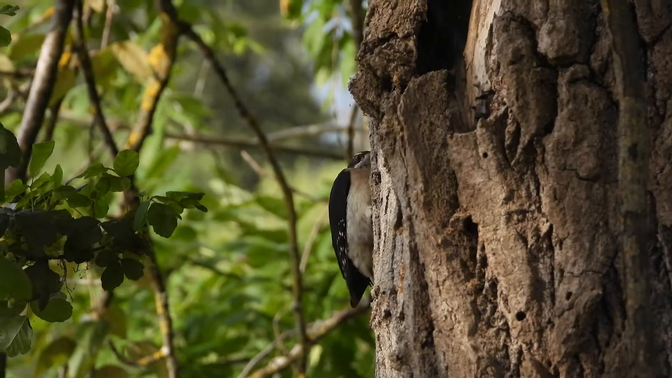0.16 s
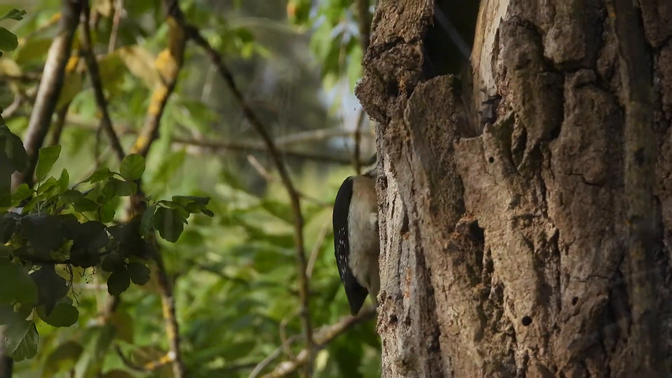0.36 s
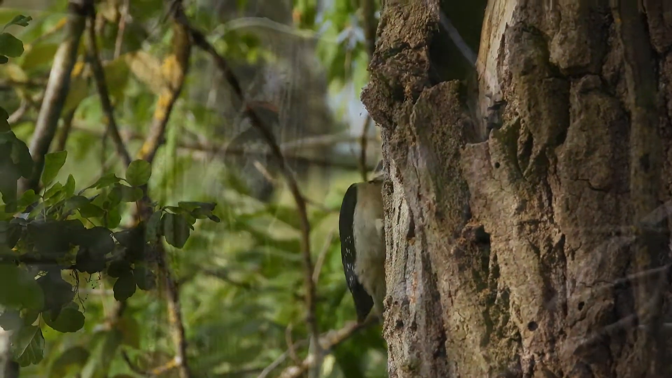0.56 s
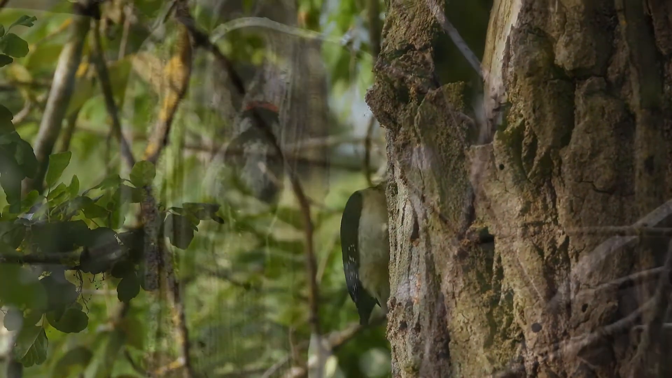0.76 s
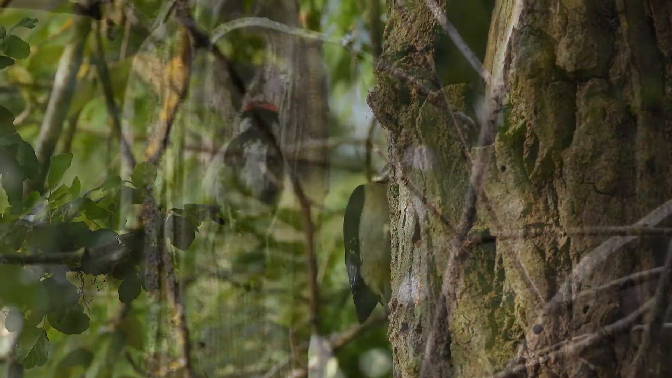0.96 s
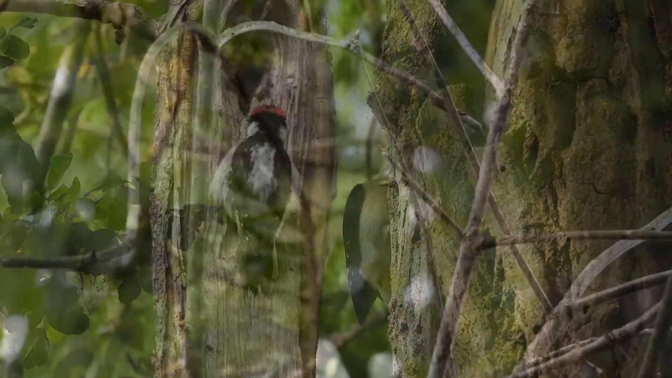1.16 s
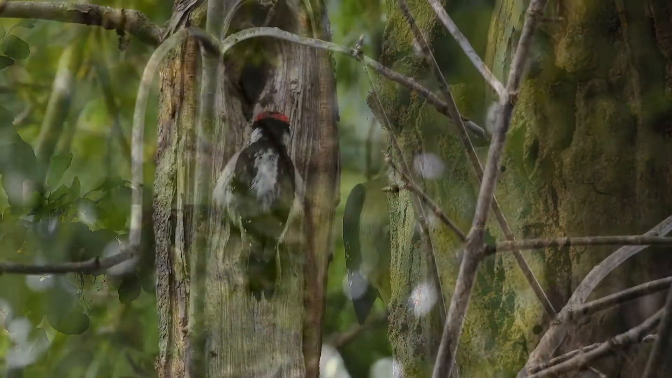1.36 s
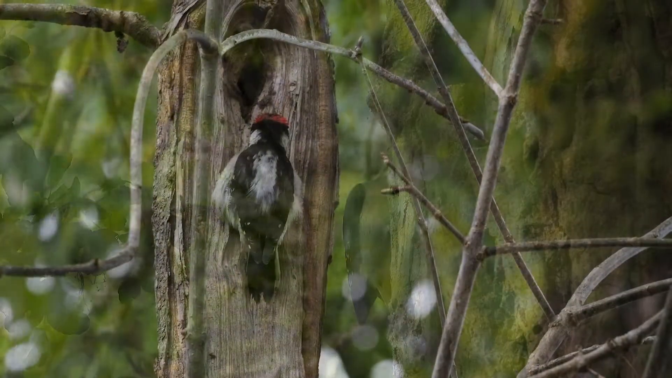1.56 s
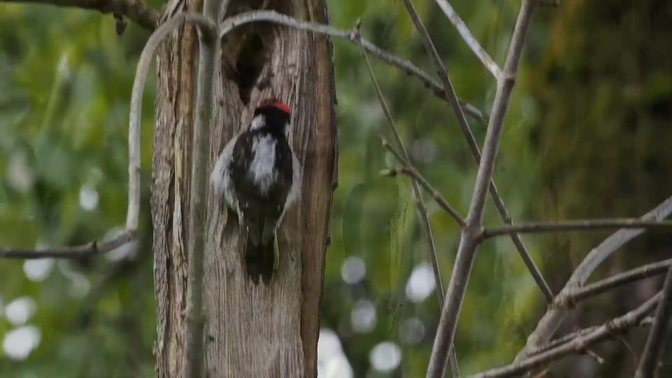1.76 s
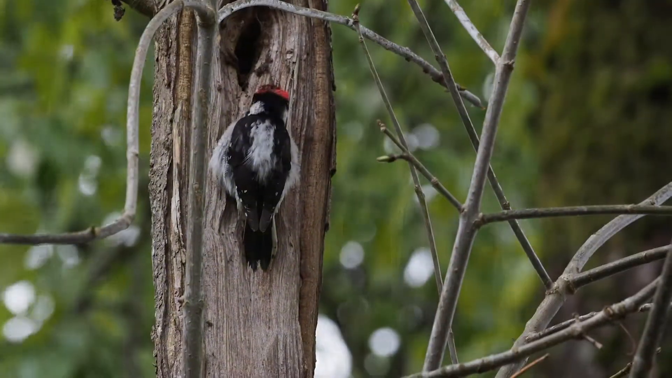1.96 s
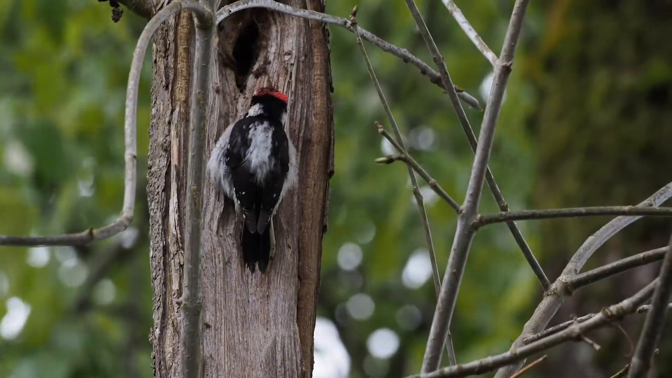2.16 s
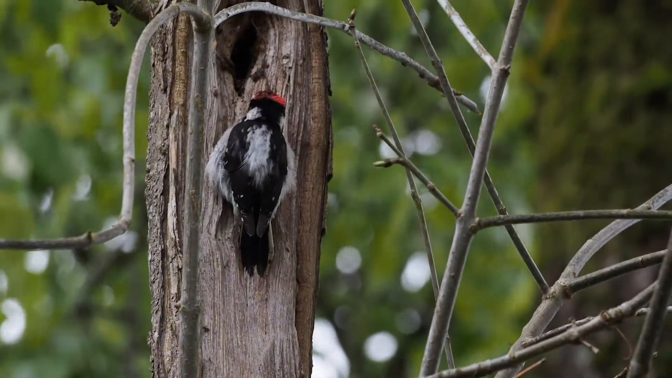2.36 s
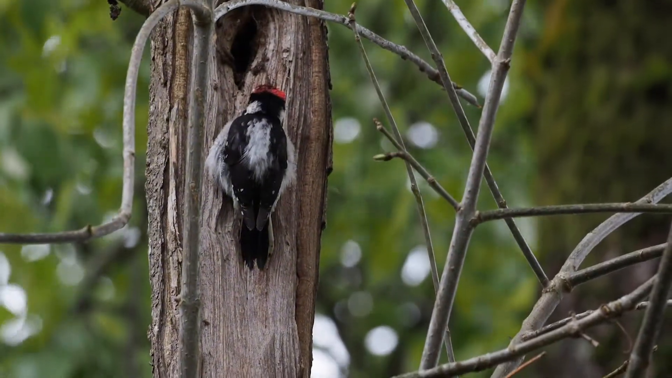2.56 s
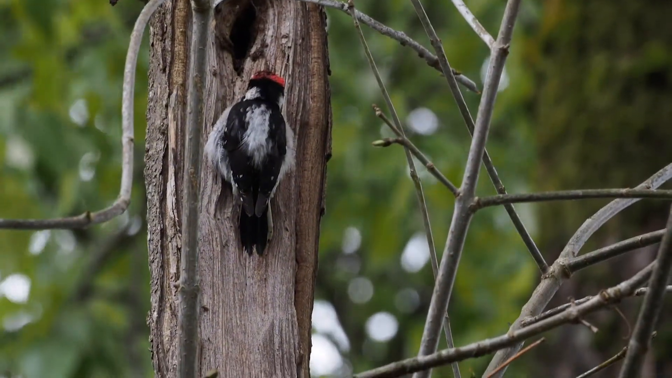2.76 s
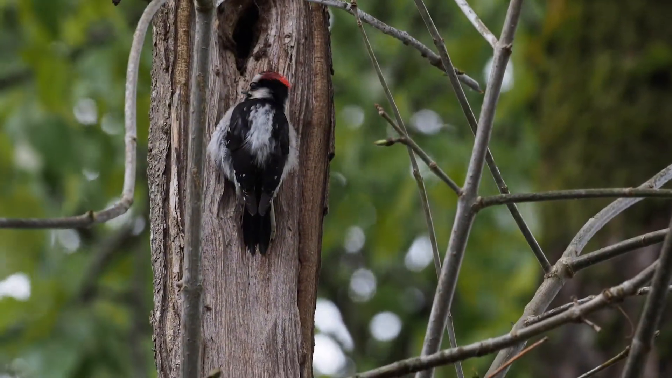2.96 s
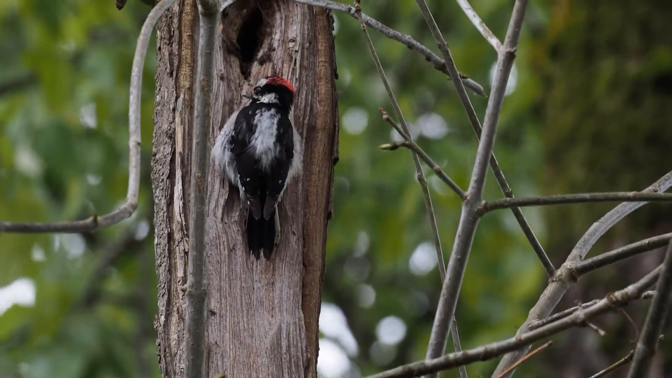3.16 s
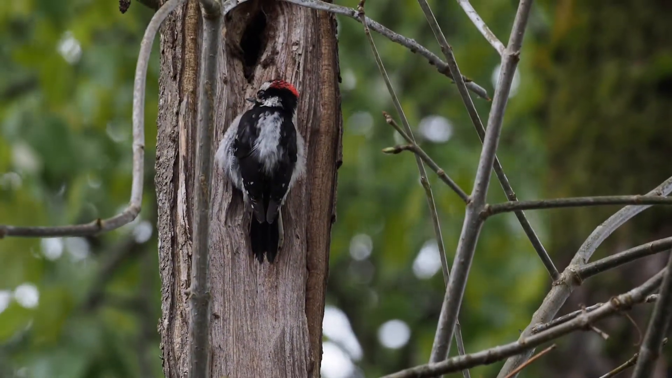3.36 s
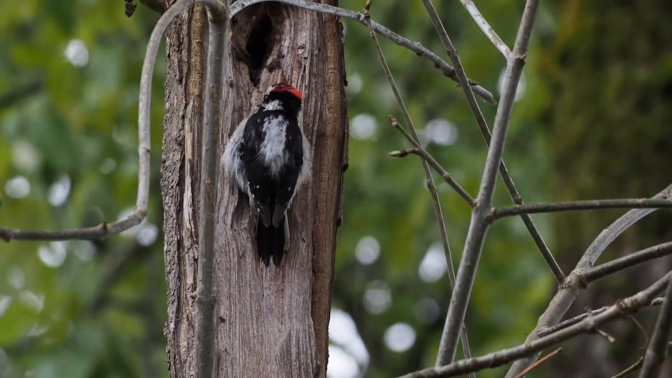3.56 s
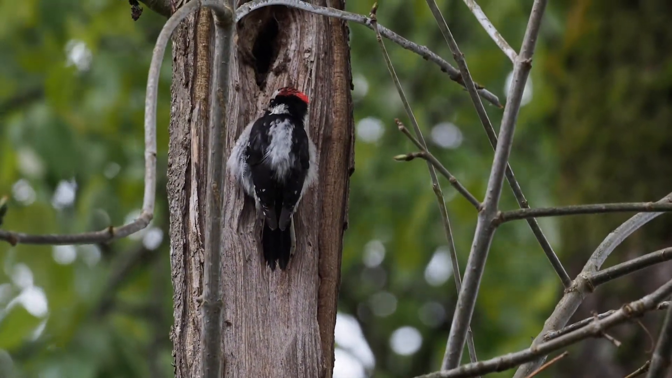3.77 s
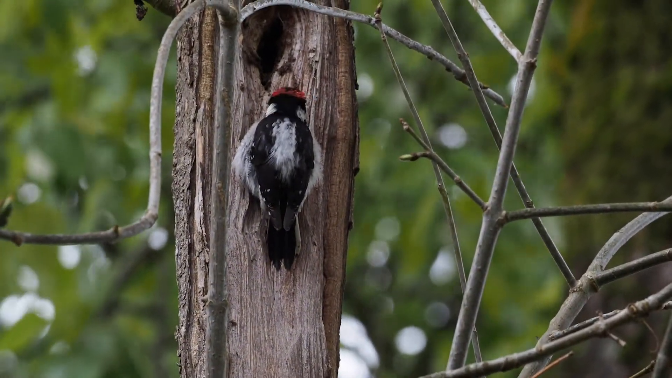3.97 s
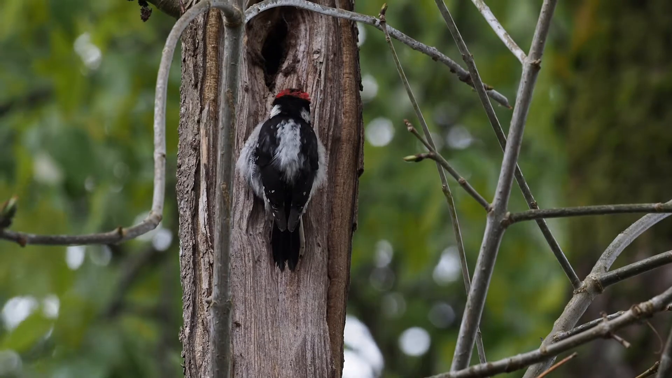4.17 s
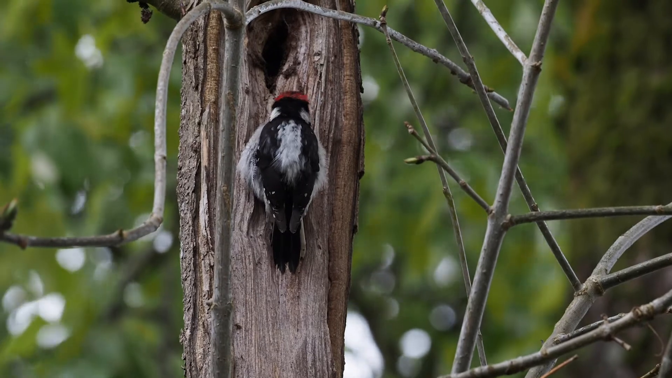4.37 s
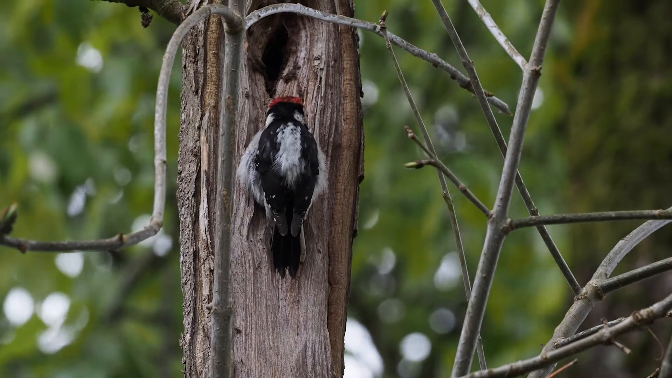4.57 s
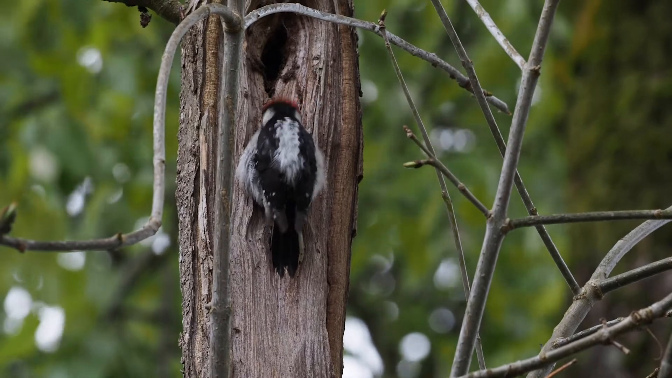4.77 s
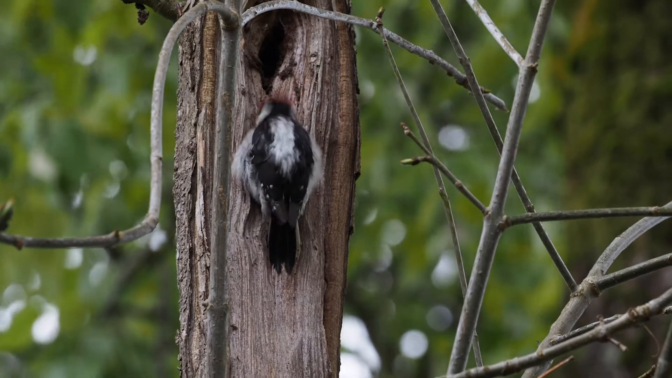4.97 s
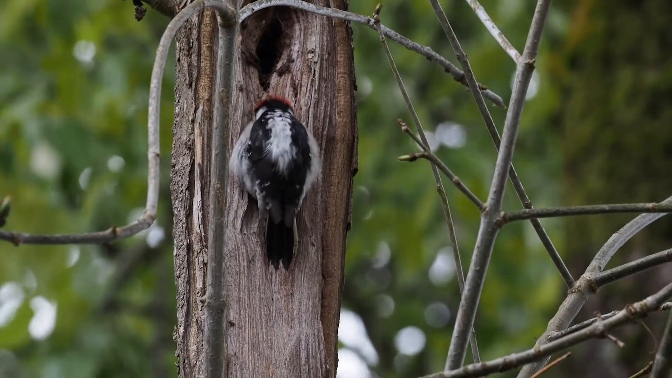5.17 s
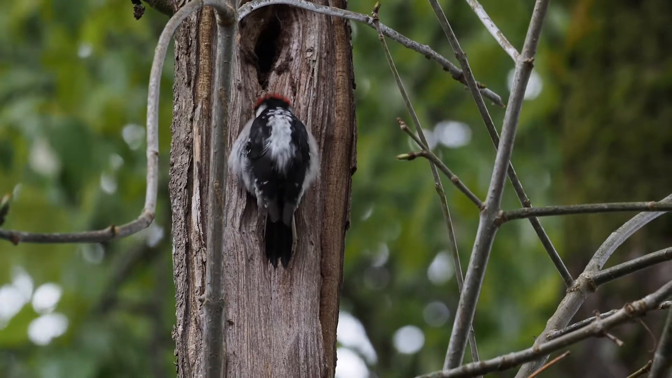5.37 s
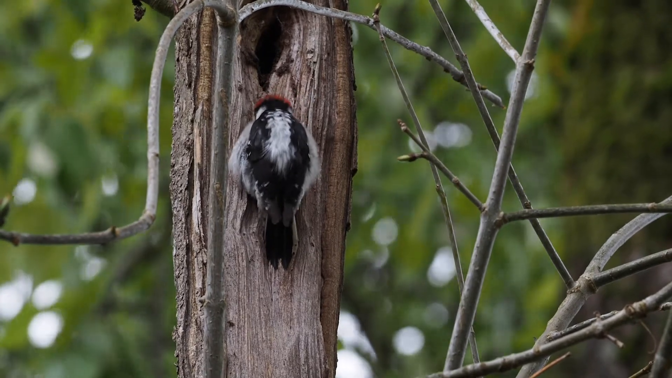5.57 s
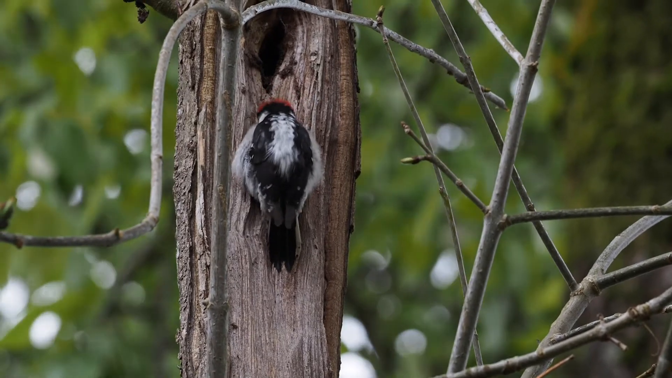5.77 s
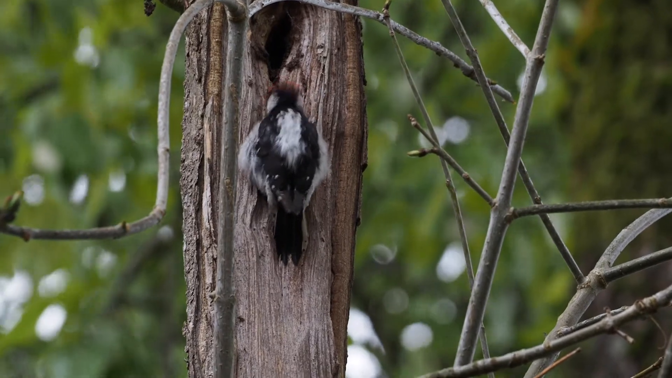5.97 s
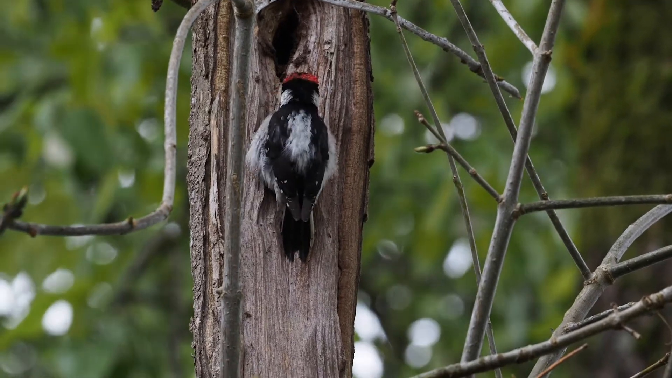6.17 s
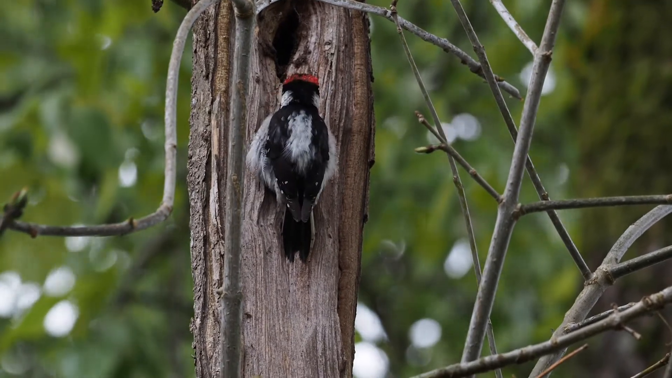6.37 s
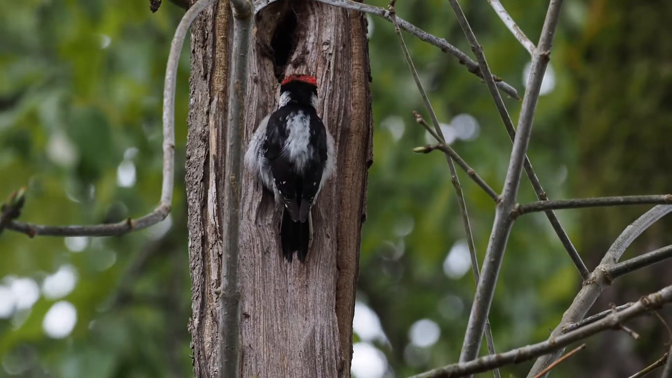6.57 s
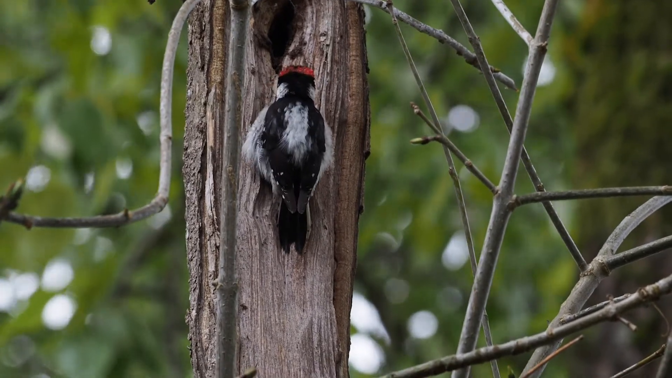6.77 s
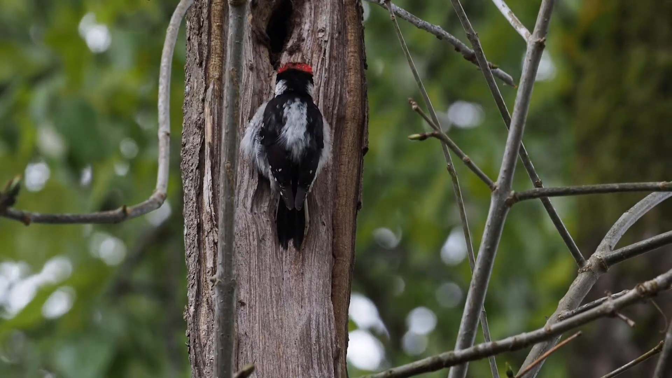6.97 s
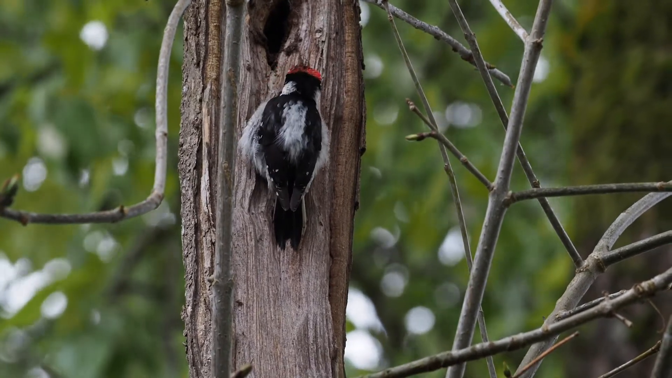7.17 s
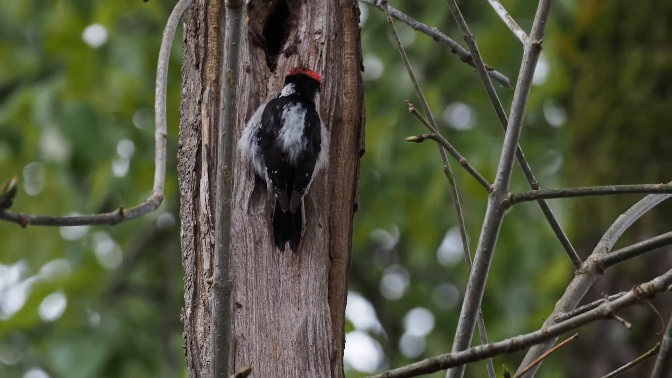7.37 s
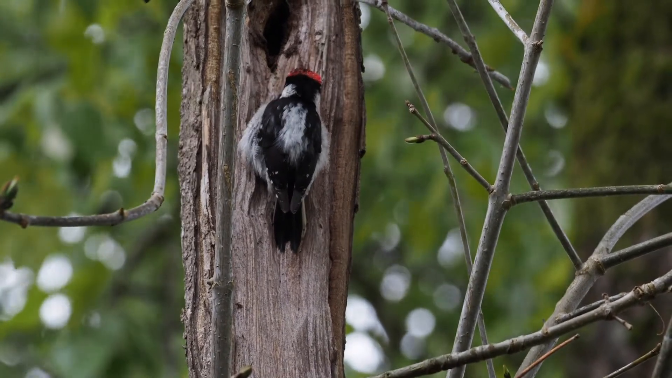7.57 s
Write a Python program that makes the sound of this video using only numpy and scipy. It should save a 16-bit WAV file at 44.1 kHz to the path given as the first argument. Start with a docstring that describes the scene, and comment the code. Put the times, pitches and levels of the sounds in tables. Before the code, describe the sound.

In a very quiet wood, a woodpecker gives two faint taps on bark, and the sound fades away. A louder woodland opens, with a steady distant rush, light leaf hiss and small birds warbling, whistling and trilling. Past the middle, the woodpecker drums one loud, rapid roll on a hollow trunk, fairly near the microphone. It slows slightly and echoes through the trees while the birds carry on.

```python
"""A woodpecker in two woods

In a very quiet wood, a woodpecker taps twice on bark, and everything fades to silence.
Then a louder wood opens, with a distant rush, a low hum and small birds that whistle and trill.
A woodpecker drums one slowing roll: each blow of its bill makes a hollow dead trunk ring,
and the ground and the trees around throw every blow back."""
import sys
import numpy as np
from scipy import signal
from scipy.fft import rfft, irfft, next_fast_len
from scipy.io import wavfile
from scipy.ndimage import map_coordinates

SR = 44100
rng = np.random.default_rng(int(sys.argv[2]) if len(sys.argv) > 2 else 0)


def generate_wav(sig):
    """Save sig (samples, or channels by samples) to the path in sys.argv[1] as 16-bit PCM at SR."""
    pcm = np.round(np.clip(np.atleast_2d(sig).T, -1, 1) * 32767).astype(np.int16)
    wavfile.write(sys.argv[1], SR, pcm)


N = 336483
SECOND_WOOD_S = 1.231  # when the louder wood starts


def drumming(start_s, count, level_db, vary_db):
    """Each blow of the bill makes the hollow trunk ring briefly at its own natural pitches."""
    # the trunk's ringing tones: (pitch [Hz], relative level [dB], time to fade 60 dB [s], rise time [s])
    trunk_tones = [(595, -12.5, 0.04, 0.012), (859, -24, 0.064, 0.0016), (1044.6, 2, 0.032, 0.00095),
                   (2152, -14.5, 0.0065, .0003), (2390, -15, 0.0066, 0.00032),
                   (2860, -21.5, 0.0073, 0.00014), (3900, -33, .004, .0002), (5370, -31, 0.0037, .0002),
                   (8100, -42, 0.0047, .0003)]
    # the bird slows as it goes: (blow number, gap to the next blow [ms])
    blow_gaps = [(0, 58.3), (1, 56.9), (10, 68), (13, 65), (18, 76.8), (19, 84)]
    # it gains force, tires slowly and ends softly: (blow number, relative strength [dB])
    blow_force = [(0, -5), (1, -.5), (3, 1.34), (19, -0.34), (20, -2.5)]
    # how well the narrow trunk passes sound to the air: (frequency [Hz], gain [dB])
    radiation = [(40, -18), (200, -11.5), (400, -8.5), (520, -4), (1100, -1), (1500, -5), (1750, -9),
                 (1950, 0), (3200, -1.5), (5500, -2), (6500, -9), (12000, 1.5)]
    t = np.arange(SR // 12) / SR
    hz, db, t60, rise = np.transpose(trunk_tones)[:, :, None]
    envelopes = amp(db - 60 * t / t60) * (1 - np.exp(-t / rise))
    tones = -envelopes * np.sin(2 * np.pi * hz * t)
    number = np.arange(count)
    gaps_s = np.interp(number, *np.transpose(blow_gaps)) / 1000
    times = start_s + np.cumsum(gaps_s) - gaps_s
    strengths = np.interp(number, *np.transpose(blow_force))
    # the bill lands a little differently each time, which matters most to the high tones
    changes = vary_db * rng.standard_normal((count, len(trunk_tones))) * np.minimum(hz.T / 3000, 1) ** 2
    blows = np.zeros(N)
    for s, strength_db, change_db in zip(times, strengths, changes):
        add(blows, s, amp(level_db + strength_db + change_db) @ tones)
    return filtered(blows, lambda hz: amp(along(radiation, hz)))


def among_trees(blows, pan_db, forest_db):
    """The blows arrive directly, then bounce back from the ground, trunks, twigs and far trees."""
    # echoes from the ground and near trunks: (delay [ms], left gain [dB], right gain [dB])
    near_echoes = [(5.24, -12, -12), (7.31, -11, -18), (9.12, -17, -23), (13.01, -35, -20),
                   (16.16, -21, -25), (23.9, -17, -17), (37.98, -19, -23)]
    direct = panned(blows, pan_db)
    near = direct.copy()
    for ms, left_db, right_db in near_echoes:
        add(near, ms / 1000, direct * amp([[left_db], [right_db]]))
    return near + twig_echoes(blows, t60=0.62) + amp(forest_db) * forest_echo(near.mean(axis=0))


def bark_taps(thud_t60, splinter_t60, thud_db, knock_db):
    """A light peck makes a knock, a dull thud and a spray of bark; a harder one rings brighter."""
    # the pecks: (time [s], relative level [dB], splinter gain [dB], high-tone gain [dB], splinter pan [dB])
    pecks = [(.668, -52, -10.5, -17, 0), (.895, -55.5, -4.5, 3.5, -5)]
    # the solid trunk's ringing tones: (pitch [Hz], relative level [dB], time to fade 60 dB [s])
    wood_tones = [(314, -7, 0.11), (450, -1.5, 0.11), (1413, -8, 0.062), (2380, -7, 0.063)]
    # the dull thud of bark: (frequency [Hz], relative level [dB])
    thud_spectrum = [(88, -49), (150, -18), (288, 3), (469, -5), (626, -5), (710, -37), (912, -36),
                     (1200, -44), (1310, -16), (1400, -13), (1620, -36), (1930, -42), (2390, -25),
                     (3000, -33), (3900, -61), (6600, -120)]
    # bark splintering: (frequency [Hz], relative level [dB])
    splinter_spectrum = [(1500, -22), (2400, -4), (3500, -15), (5700, 5), (7000, -7), (8500, -16),
                         (12000, -17), (14000, -50)]
    out, t = np.zeros((2, N)), np.arange(SR // 5) / SR
    attack = 1 - np.exp(-t / .0015)
    for s, db, splinter_db, hard_db, pan_db in pecks:
        knock = np.zeros(len(t))
        for hz, tone_db, t60 in wood_tones:
            envelope = amp(knock_db + tone_db + hard_db * (hz > 1000) - 60 * t / t60)
            knock += envelope * np.sin(2 * np.pi * hz * t)
        thud = noise(thud_spectrum, size=len(t)) * amp(thud_db - 60 * t / thud_t60)
        spray = panned(noise(splinter_spectrum, size=len(t)), pan_db)
        spray *= amp(splinter_db - 60 * t / splinter_t60)
        add(out, s, amp(db) * (knock + thud + spray) * attack)
    return out


def songbirds():
    """All the small birds, blurred by the trees between; the farther ones carry more echo."""
    notes = warbler(gain_db=-1.7, pan_db=6.5) + high_whistles(gain_db=-1) + peeps(gain_db=-0.5)
    notes += pips(start_s=0.3904, period_s=.1135, first_db=-54.5, loss_db=3, count=5)
    far = rasps(gain_db=-1, pan_db=-5) + trills(gain_db=-3)
    far += far_chorus(low_hz=2557, high_hz=7570, slide=.2, high_db=-18, count=150)
    second_wood = np.arange(N) / SR >= SECOND_WOOD_S
    direct = np.where(second_wood, lagged(notes, ms=0.12) + amp(-2) * far, notes + far)
    # the first wood has less echo
    scatter = amp(np.where(second_wood, -6.5, -7)) * twig_echoes(notes + far, t60=.15)
    tail = amp(np.where(second_wood, -8, -17)) * forest_echo(notes + amp(1.5) * far)
    return direct + scatter + tail


def warbler(gain_db, pan_db):
    """A bird sings quick sliding notes; most fall in pitch and flatten toward the end."""
    # its notes: (time [s], middle pitch [Hz], glide [octaves], relative level [dB])
    slides = [(1.226, 3950, -.35, -48.5), (1.41, 3700, -.45, -49), (1.678, 3470, -0.39, -43),
              (1.715, 3750, .3, -49), (1.828, 4050, -.25, -46), (1.968, 3440, -0.56, -37),
              (2.075, 4260, .12, -47.5), (2.125, 3000, .25, -43), (2.16, 3020, -.22, -36),
              (2.208, 3080, -.4, -35), (2.398, 3295, -0.47, -38.5), (2.528, 3100, -.5, -41),
              (2.604, 2866, 0.19, -41), (2.684, 3380, -.38, -42.5), (2.713, 3650, .42, -46.5),
              (2.75, 3230, -.4, -38.5), (2.882, 3000, -.1, -40.5), (2.944, 2480, -.3, -48),
              (3.165, 4140, -.48, -42.5), (3.33, 4200, -.2, -46), (3.365, 3820, -.1, -47.5),
              (3.406, 3184, -.48, -40), (3.526, 2900, -0.21, -45), (3.567, 3026, .35, -42.5),
              (3.667, 3280, -.35, -47), (3.781, 3090, -.5, -45), (3.888, 3220, -0.51, -39.5),
              (4.005, 2900, -0.47, -47), (4.103, 2900, -0.47, -49)]
    out = np.zeros((2, N))
    for s, hz, octaves, db in slides:
        path = glide(hz, octaves, length_s=.043, bend=.08 * abs(octaves))
        add(out, s, clear_note(path, db + gain_db, pan_db))
    return out


def high_whistles(gain_db):
    """A second bird whistles thin high notes whose pitch sags at both ends."""
    # its notes: (time [s], length [s], middle pitch [Hz], glide [octaves], relative level [dB])
    notes = [(4.355, .03, 5480, -.03, -59), (4.501, .088, 5450, .12, -63), (4.593, .07, 6750, .05, -62.5),
             (4.813, 0.15, 5690, .06, -51), (5.047, .075, 5900, -.02, -52), (5.11, .105, 5890, .04, -53.5),
             (5.256, .145, 6350, .13, -53.5), (5.441, .098, 6700, 0.044, -50.5),
             (5.606, .12, 6880, .02, -53.5), (5.759, .092, 6820, .06, -54.5), (6.1, .12, 4380, -.18, -58),
             (6.535, .044, 5510, 0.0099, -57), (7.52, .09, 6150, .02, -65), (7.58, .045, 7570, -.04, -62)]
    # where it is heard, on the right: (time [s], pan [dB])
    position = [(5.1, -11), (5.5, -4.5)]
    out = np.zeros((2, N))
    for s, length_s, hz, octaves, db in notes:
        pan_db = np.interp(s, *np.transpose(position))
        path = glide(hz, octaves, length_s, bend=-.025)
        add(out, s, clear_note(path, db + gain_db, pan_db, waver=.009))
    return out


def peeps(gain_db):
    """Short clear calls, all on the right."""
    # a third bird's low peeps: (time [s], pitch [Hz], glide [octaves], relative level [dB])
    low_peeps = [(6.295, 2430, -0.151, -48), (6.495, 3060, -.17, -49), (6.574, 2445, .02, -47),
                 (6.735, 2520, -.19, -47), (6.933, 2430, -0.149, -49), (7.065, 2390, -.16, -48.5),
                 (7.204, 2375, .08, -51), (7.382, 3010, .02, -53), (7.488, 2300, -0.0089, -52),
                 (7.574, 2350, .06, -47)]
    # lone calls in the first wood: (time [s], pitch [Hz], glide [octaves], relative level [dB])
    lone_calls = [(.439, 740, -.11, -66.5), (.728, 4130, -.18, -59)]
    out = np.zeros((2, N))
    for calls, pan_db in (low_peeps, -7), (lone_calls, -4):
        for s, hz, octaves, db in calls:
            add(out, s, clear_note(glide(hz, octaves, length_s=0.0352), db + gain_db, pan_db))
    return out


def pips(start_s, period_s, first_db, loss_db, count):
    """A bird in the first wood pips evenly, each pip softer than the last."""
    out = np.zeros((2, N))
    path = glide(hz=3400, octaves=-0.082, length_s=0.028)
    for k in range(count):
        add(out, start_s + k * period_s, clear_note(path, first_db - k * loss_db, pan_db=-9))
    return out


def rasps(gain_db, pan_db):
    """Short harsh notes in the warbling song, made by a wide, fast swing of pitch."""
    # the rasps: (time [s], pitch [Hz], relative level [dB])
    calls = [(2.663, 5680, -54.5), (3.388, 6250, -57), (3.751, 5500, -54), (3.83, 5200, -55)]
    out = np.zeros((2, N))
    for s, hz, db in calls:
        path = glide(hz, octaves=-.14, length_s=.04)
        add(out, s, buzz(path, swing_hz=.115 * hz, swings_per_s=132, db=db + gain_db, pan_db=pan_db))
    return out


def trills(gain_db):
    """Birds swing their pitch quickly up and down in buzzy calls, most longer than the rasps."""
    # the trills: (time [s], length [s], pitch [Hz], glide [octaves], swing [Hz],
    # swing rate [1/s], relative level [dB], pan [dB])
    calls = [(.1, .17, 1886, 0, 231, 107, -61.5, 14), (.172, 0.039, 1928, -0.01, 200, 87, -53, 7),
             (0.322, .046, 1725, -.09, 150, 140, -62, 8), (4.35, .33, 3690, .28, 381, 118, -50.5, 11),
             (4.41, .1, 7300, -.08, 200, 150, -62, 0), (5.39, .47, 4970, .06, 230, 67, -48.5, -8),
             (6.58, .52, 4294, .02, 370, 88, -57.5, -1), (7.24, 0.26, 3080, 0, 130.7, 63, -56, -2)]
    out = np.zeros((2, N))
    for s, length_s, hz, octaves, swing_hz, swings_per_s, db, pan_db in calls:
        add(out, s, buzz(glide(hz, octaves, length_s), swing_hz, swings_per_s, db + gain_db, pan_db))
    return out


def far_chorus(low_hz, high_hz, slide, high_db, count):
    """Far birds add faint sliding chirps at random times; the high ones are rarer and weaker."""
    # how loud the far birds are: (time [s], relative level [dB])
    loudness = [(1.3, -59), (2.2, -54), (3.6, -55), (4.1, -51), (4.25, -68), (7.6, -60)]
    out = np.zeros((2, N))
    for when, height, length, tilt, side in rng.random((count, 5)):
        s = SECOND_WOOD_S + when * (N / SR - SECOND_WOOD_S)
        hz = low_hz * (high_hz / low_hz) ** (height ** 2)
        size = int((0.015 + 0.097 * length) * SR)
        path = hz * (1 + slide * (tilt - .7) * np.linspace(-1, 1, size))
        db = np.interp(s, *np.transpose(loudness)) + high_db * height ** 2
        add(out, s, whistle(path, db, pan_db=12 * (side - .5), edge_s=0.045))
    return out


def glide(hz, octaves, length_s, bend=0):
    """A pitch path that slides through hz; both ends are shifted by bend octaves."""
    position = np.linspace(-.5, .5, int(length_s * SR))
    return hz * 2 ** (octaves * position + bend * (2 * position) ** 2)


def whistle(path, db, pan_db, edge_s):
    """A bird's pure tone along a pitch path; it swells and fades within edge_s seconds."""
    swell = signal.windows.tukey(len(path), min(2 * edge_s * SR / len(path), 1))
    return panned(amp(db) * swell * sine(path), pan_db)


def clear_note(path, db, pan_db, waver=0.0058):
    """A short whistle whose pitch wavers slightly."""
    return whistle(path * (1 + waver * wobble(160, size=len(path))), db, pan_db, edge_s=0.0098)


def buzz(path, swing_hz, swings_per_s, db, pan_db):
    """A whistle whose pitch swings fast and unevenly, loudest at the top of each swing."""
    swing = sine(swings_per_s * (1 + .12 * wobble(40, size=len(path))))
    hz = path + swing_hz * (swing - .45 + 0.39 * wobble(600, size=len(path)))
    pulsing = unit(amp(2 * swing))
    return pulsing * whistle(hz, db, pan_db, edge_s=.065)


def twig_echoes(x, t60):
    """Branches scatter the treble as many tiny echoes that fade 60 dB in t60 seconds."""
    # what the twigs throw back: (frequency [Hz], gain [dB])
    twig_spectrum = [(400, -17), (800, -17), (1100, -24), (1500, 3), (2100, -3), (3200, -1.5), (6000, -7.5),
                     (12000, -18)]
    t = np.arange(SR // 3) / SR
    clicks = rng.standard_normal((3, len(t))) * (rng.random((3, len(t))) < 900 / SR)
    # each side has its own clicks and shares a third set
    echoes = (clicks[:2] + clicks[2]) * amp(-60 * t / t60) * (t > .004)
    echoes /= np.linalg.norm(echoes[0])
    return echoed(x, filtered(echoes, lambda hz: amp(along(twig_spectrum, hz))))


def forest_echo(x):
    """Many trees answer with one long smooth echo; the highest treble dies first."""
    # how long the echo lasts: (frequency [Hz], time to fade 60 dB [s])
    fade_times = [(200, 1.1), (1000, 1.63), (2500, 1.76), (6000, 1.5), (12000, 0.46)]
    white = noise([(20, 0), (20000, 0)], size=SR)
    hz, t, bands = signal.stft(white, SR, nperseg=256)
    fades = amp(-60 * t / along(fade_times, hz)[:, None])
    tail = signal.istft(bands * fades, SR, nperseg=256)[1]
    tail *= 1 - np.exp(-np.arange(tail.shape[1]) / SR / 0.0062)  # soft start
    return echoed(x, tail / np.linalg.norm(tail[0]))


def hush(gain_db):
    """The faint steady noise of the first wood dies away."""
    # its fade: (time [s], relative level [dB])
    loudness = [(0.276, -75), (0.534, -77.5), (0.838, -83), (0.958, -110)]
    # its tone colour: (frequency [Hz], relative level [dB])
    spectrum = [(35, -58), (60, -49), (190, -2), (448, -8.5), (835, -2.5), (1330, -8.5), (2590, -24),
                (4210, -16.5), (7000, -31), (10600, -21), (15000, -45)]
    return amp(curve(loudness) + gain_db) * noise(spectrum)


def distant_rush(start_db, fade_db_per_s):
    """A low, far noise that flutters a little and slowly ebbs."""
    # its tone colour: (frequency [Hz], relative level [dB])
    spectrum = [(15, -90.5), (25, -60.5), (71, -24.5), (117, -20), (151, -15), (216, -8), (252, -5),
                (288, -4), (501, -7), (668, -3), (856, -4), (1020, -2), (1350, -9), (1840, -19),
                (2400, -34), (3120, -44.5), (5280, -120)]
    elapsed = np.arange(N) / SR - SECOND_WOOD_S
    level = amp(start_db - fade_db_per_s * elapsed + .3 * wobble(13))
    return level * lagged(noise(spectrum), ms=0.1)


def leaf_hiss(db):
    """Leaves add a steady high hiss."""
    # its tone colour: (frequency [Hz], relative level [dB])
    spectrum = [(1200, -26), (2400, 6.5), (3400, -1), (4800, -9), (7400, -12), (8400, -16.5),
                (10300, -15.5), (11200, -23), (12000, -17.5), (13300, -15), (14300, -20), (15200, -20),
                (16000, -12.5)]
    return amp(db) * noise(spectrum)


def far_hum(hz, start_db, fade_db_per_s):
    """A far motor-like hum that swells a few times and fades."""
    # swells on top of the hum: (time [s], length [s], level [dB])
    swells = [(1.15, .3, -53.5), (1.798, 0.82, -53.5), (3.3, .3, -54.5), (3.719, 0.62, -55)]
    level = amp(start_db - fade_db_per_s * (np.arange(N) / SR - SECOND_WOOD_S))
    for s, length_s, db in swells:
        add(level, s, amp(db) * signal.windows.tukey(int(length_s * SR)))
    return level * sine(hz + 3 * wobble(14))


def thin_whine(hz, db):
    """A very faint high tone that wavers."""
    return amp(db) * sine(hz + 10 * wobble(37))


def noise(spectrum, size=N):
    """Stereo noise of average (rms) level 1, alike on both sides in the bass but not in the treble."""
    # how alike left and right are: (frequency [Hz], likeness [0 to 1])
    likeness = [(50, .55), (150, 0.97), (300, 0.9), (700, 0.73), (1400, 0.66), (2800, 0), (15000, 0)]

    def colour(hz):
        width = np.arccos(np.clip(along(likeness, hz), -1, 1)) / 2
        return amp(along(spectrum, hz)) * [np.cos(width), np.sin(width)]

    mid, side = filtered(rng.standard_normal((2, size)), colour)
    return unit(np.array([mid + side, mid - side]))


def amp(db):
    """Turn decibels into a gain."""
    return 10 ** (np.asarray(db) / 20)


def unit(x):
    """Scale to an average (rms) level of 1."""
    return x / np.sqrt(np.mean(x ** 2) + 1e-20)


def sine(hz):
    """A pure wave that follows one frequency value per sample."""
    return np.sin(2 * np.pi * np.cumsum(hz) / SR)


def along(points, hz):
    """Read between (frequency [Hz], value) points on a logarithmic frequency scale."""
    frequencies, values = np.transpose(points)
    return np.interp(np.log(hz + 1), np.log(frequencies + 1), values)


def curve(rows):
    """Read between (time [s], value) rows at every sample."""
    return np.interp(np.arange(N) / SR, *np.transpose(rows))


def wobble(rate, size=N):
    """A smooth curve through rate random points a second."""
    return map_coordinates(rng.standard_normal(int(size * rate / SR) + 4), [np.arange(size) * rate / SR])


def filtered(x, response):
    """Multiply each frequency in x by response(hz)."""
    size = x.shape[-1]
    padded = next_fast_len(size + SR // 10)
    return irfft(rfft(x, padded) * response(np.fft.rfftfreq(padded, 1 / SR)), padded)[..., :size]


def add(track, s, sound):
    """Mix a sound into a track, starting at s seconds."""
    part = track[..., max(round(s * SR), 0):][..., :sound.shape[-1]]
    part += sound[..., :part.shape[-1]]


def panned(x, pan_db):
    """Place a sound to one side; pan is the left level minus the right."""
    return x * unit(amp([[pan_db / 2], [-pan_db / 2]]))


def lagged(x, ms):
    """Sound from one side reaches the left ms milliseconds after the right."""
    return filtered(x, lambda hz: np.exp(np.outer([-1j, 1j], np.pi * hz * ms / 1000)))


def echoed(x, echoes):
    """Play x through a stereo pattern of echoes (convolution)."""
    return signal.fftconvolve(np.atleast_2d(x), echoes, axes=1)[:, :N]


def scene():
    """Mix all sources; the first wood fades out before the second begins."""
    t = np.arange(N) / SR
    first_wood = t < SECOND_WOOD_S
    birds = songbirds()
    blows = drumming(start_s=4.7963, count=21, level_db=-4.6, vary_db=1.0)
    roll = among_trees(blows, pan_db=-1.5, forest_db=-17)
    taps = bark_taps(thud_t60=0.16, splinter_t60=0.18, thud_db=-5, knock_db=1.5)
    first_air = hush(gain_db=1.5)
    second_air = distant_rush(start_db=-43, fade_db_per_s=0.29) + leaf_hiss(db=-56)
    second_air += thin_whine(hz=6650, db=-79.5) + far_hum(hz=255, start_db=-56.5, fade_db_per_s=1.4)
    air = np.where(first_wood, first_air, second_air)
    fade_out_db = np.interp(t, [.92, 1.06, SECOND_WOOD_S], [0, -25, -70])
    fade_in_db = np.interp(t, [SECOND_WOOD_S, 1.3], [-3, 0])
    return amp(np.where(first_wood, fade_out_db, fade_in_db)) * (roll + taps + birds + air)


def record(dry):
    """Remove the very highest treble."""
    return filtered(dry, lambda hz: hz < 15750)


dry = scene()
out = record(dry)
generate_wav(out)
```